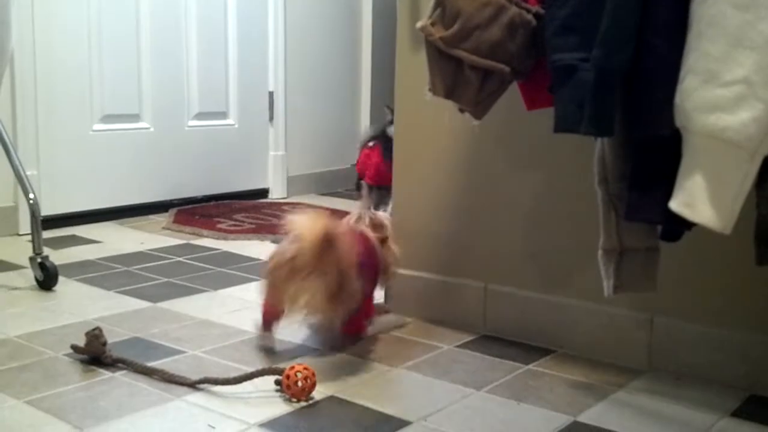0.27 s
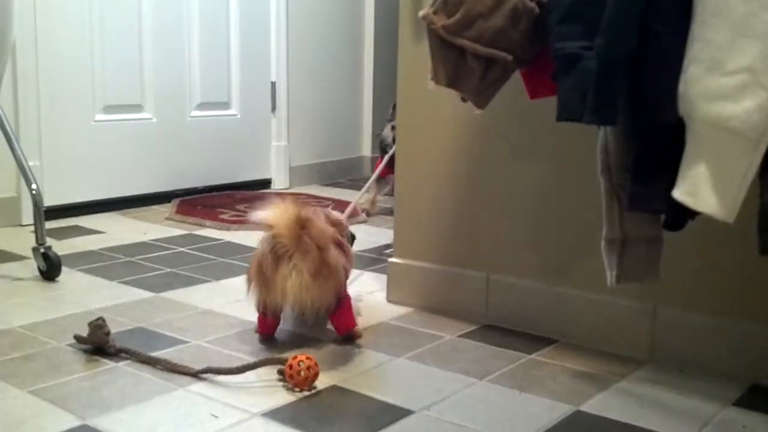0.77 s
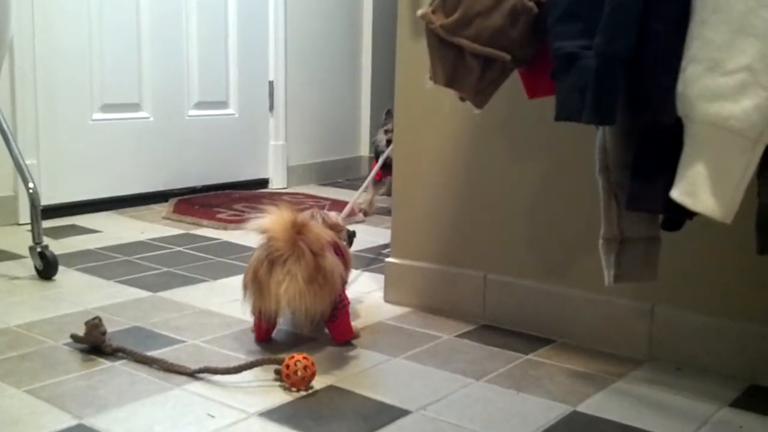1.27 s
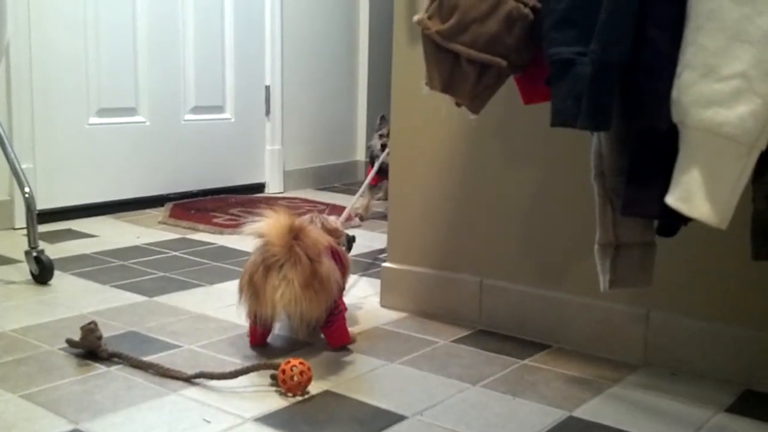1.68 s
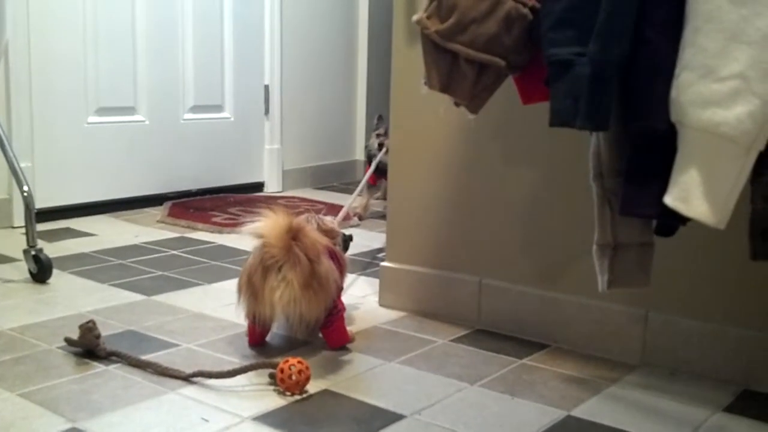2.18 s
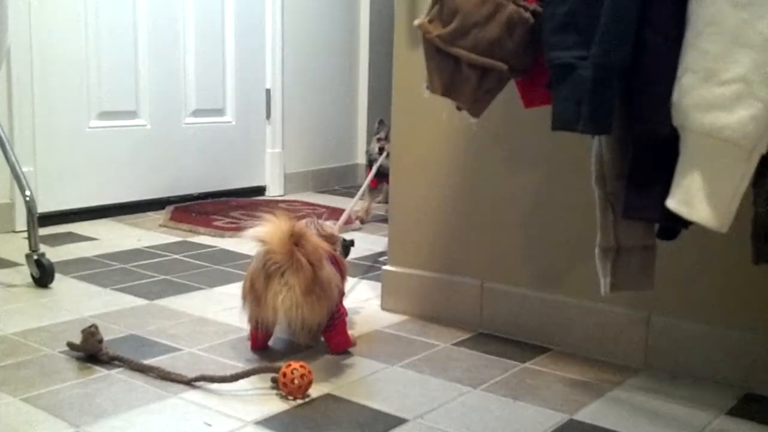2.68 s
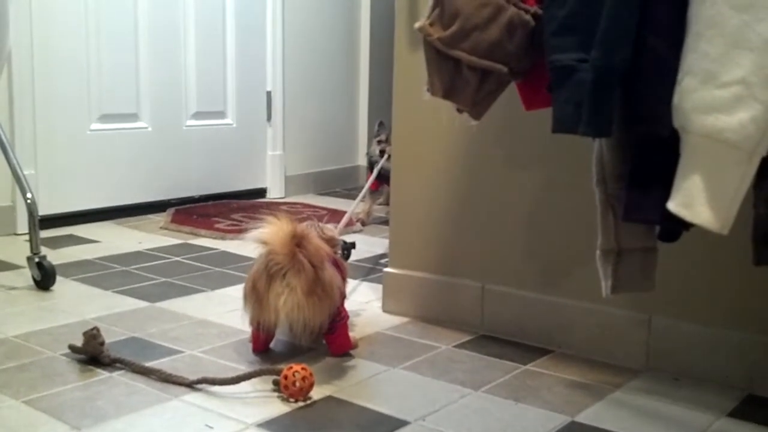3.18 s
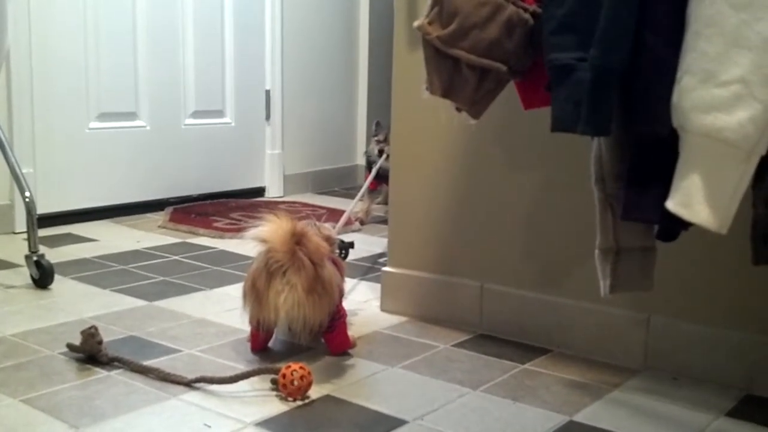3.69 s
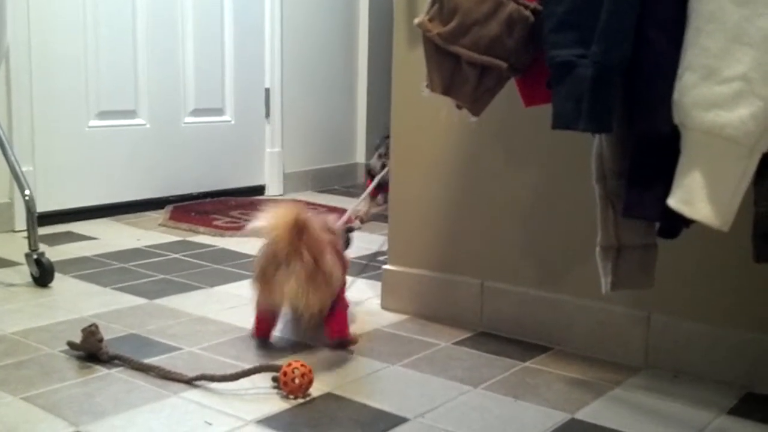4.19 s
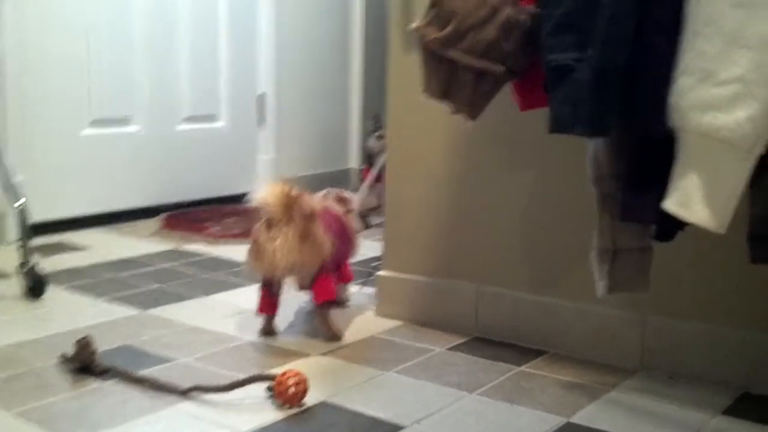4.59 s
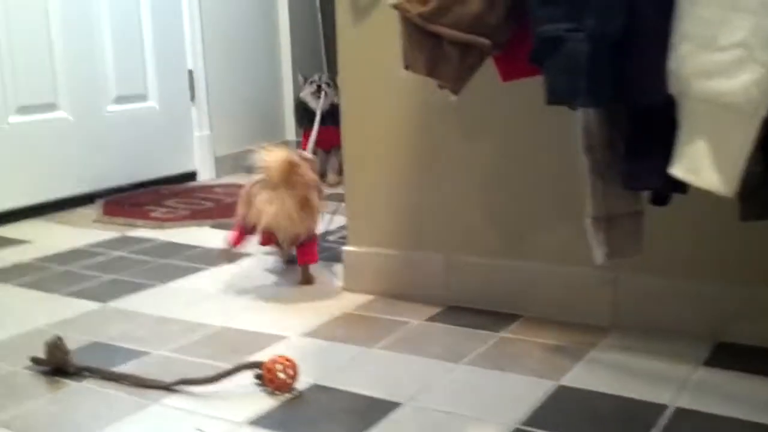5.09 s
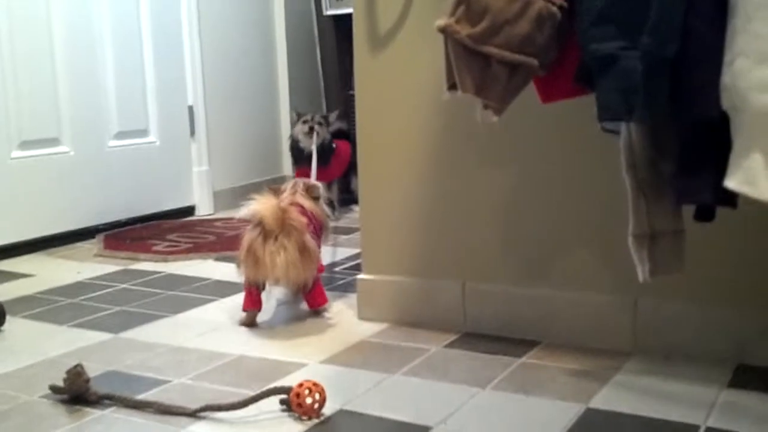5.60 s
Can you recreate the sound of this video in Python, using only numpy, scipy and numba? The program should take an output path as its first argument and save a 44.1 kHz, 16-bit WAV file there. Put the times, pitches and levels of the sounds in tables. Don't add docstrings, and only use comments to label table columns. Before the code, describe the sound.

Two small puppies yap, whimper and growl over a tug toy on hard tiles, with a sudden bark, a yelp and a sinking moan.

```python
import sys
import numpy as np
from scipy import signal
from scipy.io import wavfile
from scipy.ndimage import uniform_filter1d
from numba import njit

SR = 44100
rng = np.random.default_rng(int(sys.argv[2]) if len(sys.argv) > 2 else 0)


def magnitude_from_level(level_db):
    exponent = np.asarray(level_db, float) / 20
    return 10 ** exponent


def inscribe(sig):
    pcm = np.round(np.clip(np.atleast_2d(sig).T, -1, 1) * 32767)
    wavfile.write(sys.argv[1], SR, pcm.astype(np.int16))


N = 257984

# start_s [s], pitch_hz [Hz], effort_db [dB], jaw_opening [0 shut, 1
HIGH_YAPS = [(0.0, 279.7, -33.5, 0.5), (.036, 300, -36, 0.76), (.062, 304.4, -38, 0.92),
             (.095, 318.3, -28, 1.1), (.13, 321.4, -48.5, 0.92), (.17, 322.8, -33, 1.0),
             (.205, 311, -41.5, 0.67), (.234, 314, -37.5, 0.92), (.275, 300, -58, 0.6)]
HIGH_WHIMPER = [(.25, 300, -35.5, 1), (.306, 280.8, -39.5, 1), (.348, 280.7, -31.5, 0.93),
                (.38, 277, -41.5, 0.91), (.416, 282, -37, 1), (.45, 273, -40, 0.23), (.5, 266, -35.5, 1)]
HIGH_HUFF = [(.48, 265.4, -34, 0.41), (.53, 287.4, -34.5, 0.98), (.56, 322.4, -31.5, 0.82),
             (.59, 307, -36.5, 1), (.615, 265, -36, 1), (.64, 270, -33, 0.77)]
HIGH_GRUNT = [(.62, 283, -43, 1.04), (.665, 301, -35, 0.65), (.72, 297, -35.5, 1.14),
              (.755, 282.6, -38, 1.2), (.78, 268, -34, 1.14), (.81, 267.3, -43.5, 1.04),
              (.84, 278.4, -49, 1.7), (.88, 269, -61, 1.5)]
HIGH_GROWL = [(1.185, 218.4, -50, 0.11), (1.21, 223, -48, 0.047), (1.28, 223, -45.5, 0.18),
              (1.35, 218.3, -46, 0.17), (1.7, 221.3, -46, 0.17), (2.2, 222, -49, 0.13),
              (2.36, 233, -47.5, 0.1), (2.57, 232.2, -46.5, 0.18), (2.7, 216.8, -47, 0.33)]
HIGH_TUG = [(3.21, 189.8, -54, -0.33), (3.28, 194.5, -46, 0.0031), (3.51, 205.2, -49, 0.097),
            (3.83, 216.8, -53, 0.13), (4.0, 217.5, -52, 0.16), (4.08, 214.4, -49, 0.24),
            (4.2, 199.7, -43.5, 0.021), (4.31, 197.3, -61, 0.41)]
HIGH_WINDUP = [(4.225, 239.3, -40, 0.047), (4.255, 248.9, -35, 0.051), (4.28, 257.2, -42.5, 0.092),
               (4.3, 267, -32, 0.11), (4.33, 295, -55, 0.38)]
HIGH_BARK = [(4.3, 285.2, -30, 0.66), (4.322, 306.9, -31, 0.71), (4.345, 326.5, -32, 1.28),
             (4.37, 336, -30.5, 0.97), (4.4, 314.7, -36.5, 1), (4.425, 300, -34, 1.04),
             (4.46, 288, -40.5, 1.08), (4.5, 300, -47, 1.4), (4.57, 300, -69, 0.96)]
HIGH_PANT = [(4.55, 295, -66, 0.51), (4.59, 278, -53, 0.53), (4.625, 269, -53.5, 1), (4.66, 258, -84, .8),
             (4.72, 251, -79, 0.89)]
HIGH_GATHER = [(4.908, 169.4, -59, -0.33), (4.93, 180.7, -52.5, -.2), (4.955, 188.9, -40, -0.048),
               (4.98, 203.8, -36, 0.042), (5.005, 230, -36.5, 0.45), (5.03, 272, -34, .6)]
HIGH_YELP = [(5.0, 266.8, -41, 1.3), (5.022, 314.7, -32.5, 0.72), (5.045, 350.9, -32, 1.17),
             (5.068, 395.8, -34.5, 0.95), (5.082, 371.3, -42, 1.45), (5.097, 339, -34, 0.78),
             (5.112, 331, -35.5, 1.14), (5.14, 325.5, -50, 0.72), (5.19, 300, -35, 1.1)]
HIGH_MOAN = [(5.16, 298, -50, 0.9), (5.2, 276.4, -39.5, 1.25), (5.27, 271.6, -39, 1.03),
             (5.32, 261.7, -38.5, 0.96), (5.39, 253.6, -37, 1.09), (5.46, 241.4, -41, 0.8),
             (5.56, 229.7, -41, 0.75), (5.69, 227.6, -42.5, 1.14), (5.85, 238.5, -36.5, 0.59)]
# start_s [s], pitch_hz [Hz], effort_db [dB]
LOW_START = [(0.0, 172.9, -47.5), (.4, 170.8, -62.5), (.55, 171.5, -53), (.73, 166.5, -51),
             (.85, 165.6, -55.5), (1.14, 157.6, -56.5), (1.27, 148.8, -50.5), (1.33, 130.1, -75)]
LOW_GROWL = [(2.2, 157, -54), (2.34, 148.4, -51.5), (2.53, 158.6, -49), (2.72, 168.4, -48.5),
             (2.85, 165.8, -49), (3.04, 155.7, -54), (3.3, 150.7, -50.5), (3.55, 151.8, -51),
             (3.74, 157.8, -48.5)]
LOW_STRAIN = [(3.7, 155.7, -51.5), (3.9, 175.2, -47.5), (4.06, 176.8, -45), (4.16, 189.6, -48.5),
              (4.2, 199.3, -47.5), (4.32, 198.8, -47)]
LOW_END = [(5.12, 198, -43.5), (5.23, 196, -57.5), (5.32, 185.4, -53), (5.52, 184.3, -53.5),
           (5.62, 184.5, -45), (5.77, 181.6, -49.5), (5.85, 190.5, -48)]
# start_s [s], beats_so_far [count], depth [share of full]
GROWL_BEATS = [(1.185, 0.47, 1.1), (1.301, 4.63, 2.04), (1.5, 9.6, 1), (1.7, 13.8, 0.97),
               (1.999, 22.4, 1.4), (2.2, 27.8, 1.64), (2.33, 30.8, 2), (2.418, 34, .35), (2.701, 41, 0.54)]
TUG_BEATS = [(3.201, .3, 0.41), (3.35, 4.85, 1.2), (3.55, 9.8, 3.4), (3.651, 14.7, 1.08),
             (3.75, 15.44, 3.6), (4.051, 26, 1.7), (4.321, 32.7, 0.54)]
# curve [table above], roughness [0-1], flutter_db [dB], flutter [Hz or table of beats]
HIGH_ORDER = [(HIGH_YAPS, .64, 1.3, 26), (HIGH_WHIMPER, .38, 1.5, 26), (HIGH_HUFF, .45, 1.2, 26),
              (HIGH_GRUNT, .22, 1.4, 26), (HIGH_GROWL, .25, 3.0, GROWL_BEATS),
              (HIGH_TUG, .22, 2.0, TUG_BEATS), (HIGH_WINDUP, .3, 1, 26), (HIGH_BARK, .6, 1, 26),
              (HIGH_PANT, .9, 1, 26), (HIGH_GATHER, .5, 1, 26), (HIGH_YELP, .65, .8, 26),
              (HIGH_MOAN, .28, 1.4, 29)]
LOW_ORDER = [
    (LOW_START, .22, 1.6, 22),
    (LOW_GROWL, .2, 1.5, 21.5),
    (LOW_STRAIN, .2, 1.3, 25),
    (LOW_END, .25, 1.5, 24),
]
# chest_db [dB], mouth_db [dB], rasp_db [dB], nasal_over_rasp_db [dB]
HIGH_COLOUR = [(-3.5, 9, -14, 11.5), (-4.5, 0.3, -22.5, 22.5), (-5, 1, -22.5, 21), (-6, -2.5, -13.5, 19),
               (1.5, 9, -3.5, 14), (1.7, 4.5, -11.5, 12.5), (3.5, -8, -22, 2), (-10.5, 5.5, -11.5, -1),
               (-2.5, 7.5, 0.5, 10), (3, -4, -27, 20), (-5.5, 11.5, -7.5, 9.5), (-3.5, -1, -19, 20)]
LOW_COLOUR = [
    (7.5, 4.1, -13, 0.6),
    (2, 2.2, -18, 11.5),
    (2.2, 1.7, -16.5, 8.2),
    (-7.5, 7.1, -34, 24.8),
]
# upper_overtones_db [dB], tongue_db [dB], tongue_hz [Hz], hard_closure_every [cycles]
HIGH_SHADE = [(6, 2, 1400, 2), (3, -1, 1353, 2), (2, -12, 1340, 2), (11, -15, 1600, 2), (2, -9.5, 1380, 2),
              (-10, -21, 1450, 2), (-6, -10, 1104, 2), (2.5, -9, 1316, 2), (12, -7, 770, 3),
              (-2, -9, 3200, 2), (-4, -3.5, 1320, 3), (-6.5, -2, 1122, 2)]
LOW_SHADE = [
    (3, 2.5, 1200, 2),
    (3.5, -22, 1094, 2),
    (3.5, -14, 1150, 2),
    (3.5, -25, 940, 2),
]
LOW_MOUTH_HZ = [
    1414,
    627.6,
    573,
    518,
]
# multiple [of the pitch], width_hz [Hz], level_db [dB]
HIGH_CHEST = [(1.95, 220, .1), (3, 200, -6)]
LOW_CHEST = [(2, 162, 18.7), (3.02, 120, 5.8), (4.02, 98, 4.4)]
# centre_hz [Hz], width_hz [Hz], level_db [dB]
HIGH_NOSE = [(4050, 1100, .1), (6800, 2500, -17)]
LOW_NOSE = [(3300, 350, 48), (6400, 14000, -34)]
# start_s [s], level_db [dB],
# hold_s [s]
SCUFFS = [(0.038, -37, 0.08), (0.162, -44.5, 0.25), (0.538, -38, 0.031), (0.664, -45.5, 0.15),
          (0.928, -51, 0.045), (1.234, -60, 1.62), (3.3, -63, 3.7), (4.05, -50.5, 0.024),
          (4.096, -52.5, 0.31), (4.34, -37.5, 0.016), (4.443, -47, 0.023), (4.596, -54, 0.11),
          (4.97, -50.5, 0.022), (5.066, -35.5, 0.017), (5.165, -45.5, 0.041), (5.263, -50, 1.1)]
# start_s [s], peak_db [dB], ring_hz [Hz]
CLAWS = [(.986, -50, 14000), (.9955, -37, 14000), (1.0015, -48, 3900), (1.004, -50, 13500),
         (1.0068, -46, 3900), (1.025, -50, 14500), (1.031, -36, 14500), (1.0362, -39, 14000),
         (1.046, -46, 4000), (3.952, -46, 15000), (4.04, -46, 13500), (4.8545, -38.5, 14000)]
# delay_s [s], level_db [dB]
TILE_ECHOES = [
    (.0035, -12.5),
    (.0057, -14),
    (.0089, -12),
    (.0137, -12),
]
# centre_hz [Hz], width_hz [Hz], rms_db [dB]
HOUSE = [
    (122, 104, -42),
    (300, 210, -72),
    (715, 1300, -54),
    (1531, 720, -52),
    (4380, 5000, -62.5),
    (11000, 11000, -70),
]

SHUT_HZ, WIDE_HZ = 800, 1500


def high_puppy():
    out = np.zeros(N)
    for (curve, rough, flutter_db, beats), colour, shade in zip(HIGH_ORDER, HIGH_COLOUR, HIGH_SHADE):
        out += call(np.transpose(curve), rough, flutter_db, beats, colour, shade, HIGH_CHEST, HIGH_NOSE)
    return out


def low_puppy():
    out = np.zeros(N)
    for (curve, rough, flutter_db, beats), colour, shade, hz in zip(
            LOW_ORDER, LOW_COLOUR, LOW_SHADE, LOW_MOUTH_HZ):
        opening = np.full(len(curve), (hz - SHUT_HZ) / (WIDE_HZ - SHUT_HZ))
        columns = [*np.transpose(curve), opening]
        out += call(columns, rough, flutter_db, beats, colour, shade, LOW_CHEST, LOW_NOSE)
    return magnitude_from_level(6.0) * out


def call(curve, rough, flutter_db, beats, colour, shade, chest, nose):
    s, *columns = curve
    start, end = int(max(s[0], 0) * SR), min(int(s[-1] * SR), N)
    t = np.arange(start, end) / SR
    hz, tone_db, opening = (np.interp(t, s, c) for c in columns)
    upper_db, tongue_db, tongue_hz, group = shade
    nasal_db = colour[3]
    peak_db = np.percentile(tone_db, 75)
    push_db = tone_db - peak_db
    gape = opening - opening.mean()
    chest_db = peak_db + colour[0] + push_db - 9 * gape
    mouth_db = peak_db + colour[1] + 1.44 * push_db + 6 * gape
    rasp_db = peak_db + colour[2] + push_db + 5 * gape

    throb = flutter_db * throat_flutter(t, beats)
    source, puffs, phase = throat(hz, rough, int(round(group)), throb)
    unsteady_db = (1.5 + 3.5 * rough) * np.clip(walk(len(t), 55), -3, 1.1)
    tone = np.sin(2 * np.pi * phase) * magnitude_from_level(16.5 + unsteady_db)
    low = chest_ring(source + 2.6 * rough * puffs, hz, chest, upper_db)
    mouth = mouth_ring(source, opening, tongue_db, tongue_hz)
    top = nose_ring(source, puffs, opening, nose, nasal_db)
    voice = tone * magnitude_from_level(tone_db + 2.3 * throb)
    voice += level(low, 8.9) * magnitude_from_level(chest_db + 1.6 * throb)
    voice += level(mouth, -1) * magnitude_from_level(mouth_db + 1.6 * throb)
    voice += top * magnitude_from_level(rasp_db + 1.1 * throb)

    attack = (t - s[0] + (start == 0)) / 0.014
    release = (s[-1] - t + (end > N - 99)) / 0.032
    out = np.zeros(N)
    out[start:end] = voice * np.clip(np.minimum(attack, release), 0, 1)
    return out


def throat_flutter(t, beats):
    if np.isscalar(beats):
        turns = np.cumsum(beats * (1 + 0.06 * walk(len(t), 9))) / SR
        depth = 1
    else:
        s, *columns = np.transpose(beats)
        turns, depth = (np.interp(t, s, c) for c in columns)
    return np.cos(2 * np.pi * turns) * depth * (1 + 0.15 * walk(len(t), 9))


def throat(hz, rough, group, throb):
    chance = rng.standard_normal((len(hz) // 60, 2)).T
    stretch = 1 + 0.085 * rough * np.clip(chance[0], -3, 3)
    weak = np.arange(len(stretch)) % group > 0
    size = magnitude_from_level(rough * (4 * np.clip(chance[1], -2, 2) - 6 * rough * (group - 0.7) * weak))
    pulses, phase = folds(hz * (1 - 0.0035 * throb), stretch, size)
    puffs = level(np.exp(-phase / 2.5) * rng.standard_normal(len(hz)))
    leak = 1.1 * rough * (hz / hz.max()) ** 1.5
    return level(pulses - pulses.mean()) + leak * puffs, puffs, phase


@njit
def folds(hz, stretch, size):
    pulses, phase, p, k = np.zeros(len(hz) + 1), np.empty(len(hz)), 0., 0
    for i in range(len(hz)):
        step = hz[i] * stretch[k] / SR
        p += step
        if p >= 1:
            p, k = p - 1, k + 1
            pulses[i] += size[k] * p / step
            pulses[i + 1] += size[k] * (1 - p / step)
        phase[i] = p
    return pulses[:-1], phase


def chest_ring(breathy, hz, chest, upper_db):
    out = np.zeros(len(hz))
    for k, width, db in chest:
        ring = band(band(breathy, k * hz, width), k * hz, width)
        out += magnitude_from_level(db + upper_db * (k > 2.5)) * ring
    return out


def mouth_ring(source, opening, tongue_db, tongue_hz):
    hz = SHUT_HZ + opening * (WIDE_HZ - SHUT_HZ)
    width = max(118 * (np.mean(hz) / 880) ** 2.7, 110)
    mouth = band(band(band(source, hz, width), hz, width), hz, 1.5 * width)
    mouth = mouth + magnitude_from_level(tongue_db) * band(band(source, tongue_hz, 150), tongue_hz, 150)
    return signal.sosfilt(signal.butter(6, 1830, fs=SR, output="sos"), mouth)


def nose_ring(source, puffs, opening, nose, nasal_db):
    rasp = np.zeros(len(source))
    for hz, width, db in nose:
        rasp += magnitude_from_level(db) * band(band(source + puffs * hz / 5700.0, hz, width), hz, width)
    nasal_hz = 2290 - 260 * opening
    nasal = band(band(source, nasal_hz, 260), nasal_hz, 260)
    return level(rasp, 0.77) + level(nasal, nasal_db - 9.0)


def paws():
    t = np.arange(N) / SR
    rise_db_s, fall_db_s = 480, 185
    drag = magnitude_from_level(-72) * np.ones(N)
    for s, db, hold in SCUFFS:
        before, after = np.maximum(s - t, 0), np.maximum(t - s - hold, 0)
        drag += magnitude_from_level(db - rise_db_s * before - fall_db_s * after)
    grain_db = 0.9 * rng.exponential(size=N) + 1.5 * walk(N, 30)
    grains = rng.standard_normal(N) * magnitude_from_level(grain_db)
    hiss = band(grains, 14270, 9600) + 1.55 * band(grains, 3040, 7600)
    return level(hiss, 0.072) * drag


def claws():
    out = np.zeros(N)
    for s, db, hz in CLAWS:
        tap = rng.standard_normal(300) * np.exp(-np.arange(300) / 22.)
        tick = band(band(tap, hz, 0.6 * hz), hz, 0.6 * hz)
        i = int(s * SR)
        out[i:i + 300] += magnitude_from_level(db + 12.5) * tick / np.abs(tick).max()
    return out


def tiles(direct):
    near = direct.copy()
    for s, db in TILE_ECHOES:
        near += magnitude_from_level(db) * np.pad(direct, (int(s * SR), 0))[:N]
    return near


def hallway(direct):
    t60_s, damp = 0.36, 0.45
    lags = np.array([311, 457, 613, 797, 983, 1201, 1453, 1723])
    thin = signal.lfilter(*signal.butter(1, 700, "high", fs=SR), direct) + 1e-18
    return magnitude_from_level(-2.5) * walls(thin, lags, magnitude_from_level(-60 * lags / SR / t60_s), damp)


@njit
def walls(x, lags, gain, damp):
    line, soft, out = np.zeros((8, 4096)), np.zeros(8), np.zeros((2, len(x)))
    for i in range(len(x)):
        total = 0.
        for k in range(8):
            soft[k] += (1 - damp) * (gain[k] * line[k, (i - lags[k]) & 4095] - soft[k])
            total += soft[k]
            out[k % 2, i] += soft[k]
        for k in range(8):
            line[k, i & 4095] = x[i] + soft[k] - total / 4
    return out


def house():
    air = np.zeros((2, N))
    for place in air:
        for hz, width, db in HOUSE:
            noise = band(band(rng.standard_normal(N), hz, width), hz, width)
            place += level(noise, db) * magnitude_from_level(0.9 * walk(N, 3.4))
    return air


def level(x, db=0):
    return x * magnitude_from_level(db) / np.sqrt(np.mean(x ** 2))


def band(x, hz, width):
    return svf(x, np.clip(hz * np.ones(len(x)), 30, 0.45 * SR), 1. * width)


@njit
def svf(x, hz, width):
    y, b, l = np.empty(len(x)), 0., 0.
    for i in range(len(x)):
        g, k = np.tan(np.pi * hz[i] / SR), width / hz[i]
        v = (b + g * (x[i] - l)) / (1 + g * (g + k))
        b, l, y[i] = 2 * v - b, l + 2 * g * v, k * v
    return y


def walk(size, rate):
    k = int(SR / rate)
    held = np.repeat(rng.standard_normal(size // k + 1), k)
    return 1.38 * uniform_filter1d(uniform_filter1d(held, k), k)[:size]


def scene():
    low = low_puppy()
    direct = high_puppy() + low + paws()
    near = tiles(direct)
    hall = hallway(direct)
    air = house()
    ticks = claws()
    both = near + ticks + hall[0] + air[0]
    apart = 0.26 * near + 0.78 * ticks
    apart += 0.28 * (direct - np.pad(direct, (210, 0))[:N])
    apart += 1.94 * hall[1] + air[1]
    apart = signal.lfilter(*signal.butter(1, 1900, "high", fs=SR), apart)
    apart += 0.22 * band(low, 67, 280)
    return magnitude_from_level(-2.0) * np.array([both + apart, both - apart])


def roll_off(x):
    return signal.sosfilt(signal.butter(12, 17020, fs=SR, output="sos"), x)


def record(dry):
    port_lag = 16
    late = np.pad(dry, ((0, 0), (port_lag, 0)))[::-1, :N]
    x = signal.sosfilt(signal.butter(4, 150, "high", fs=SR, output="sos"), (dry - late) / 2)
    mid, side = (band(rng.standard_normal(N), 106, 80) for _ in range(2))
    x = x + level(mid, -77) + level(side, -62) * np.array([[1], [-1]])
    x = x + magnitude_from_level(-92) * rng.standard_normal(x.shape)
    x = signal.sosfilt(signal.ellip(6, 0.3, 28, 15800, fs=SR, output="sos"), x)
    return roll_off(x)


dry = scene()
out = record(dry)
inscribe(out)
```